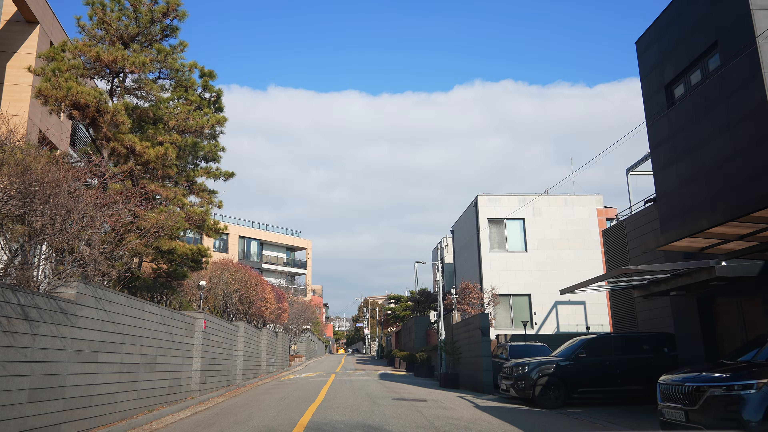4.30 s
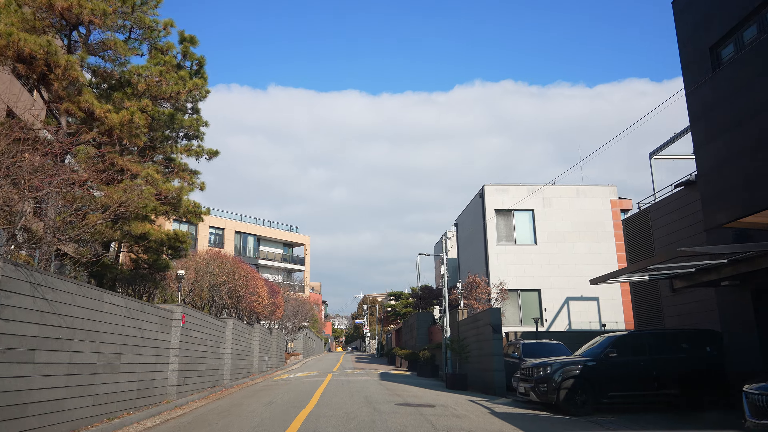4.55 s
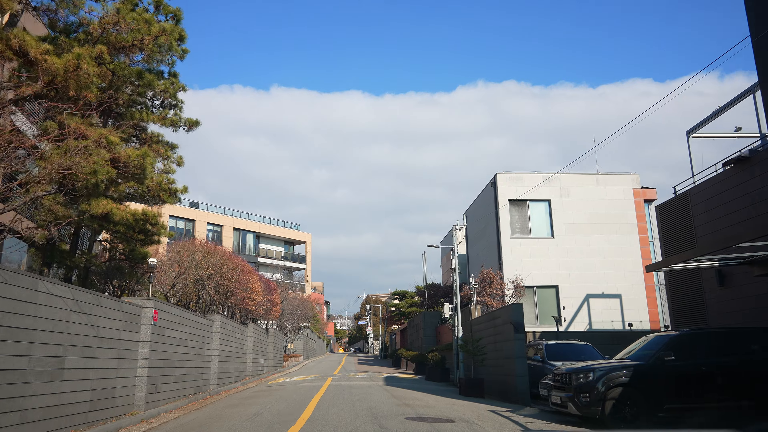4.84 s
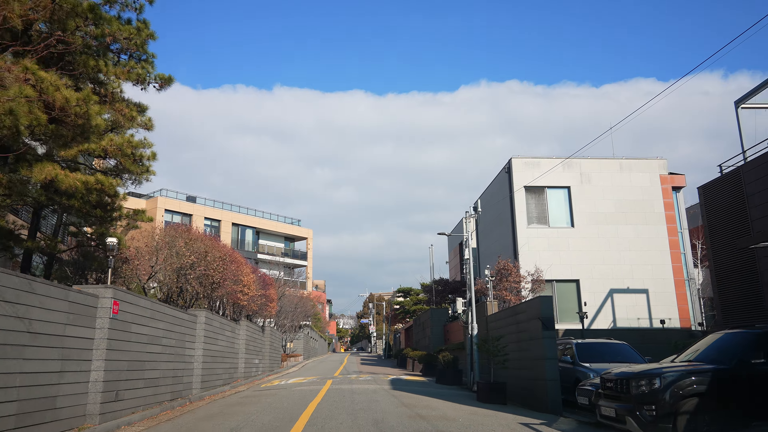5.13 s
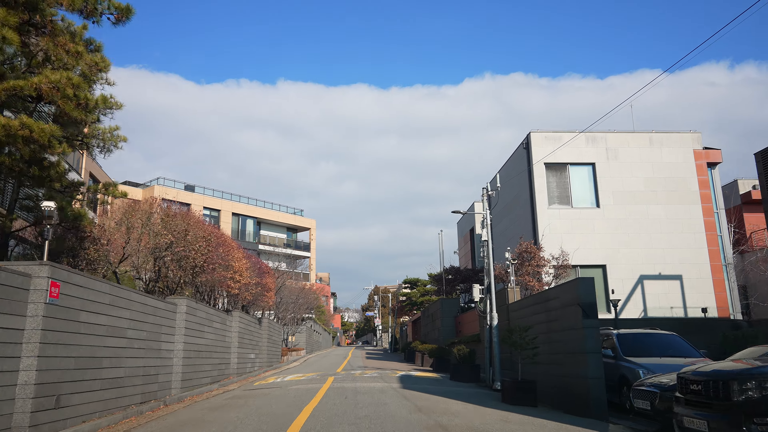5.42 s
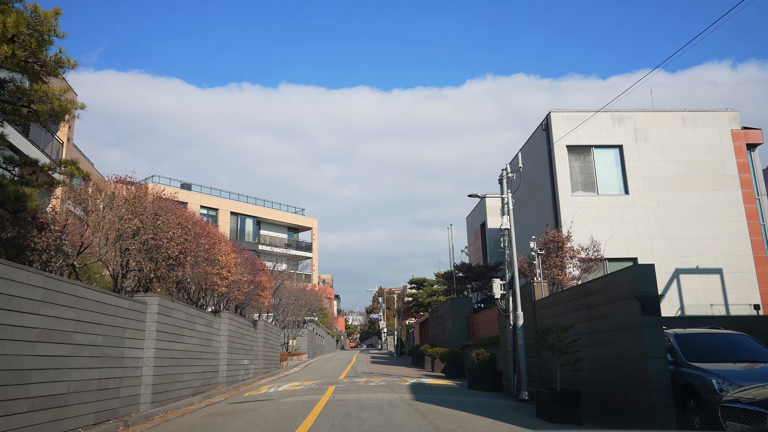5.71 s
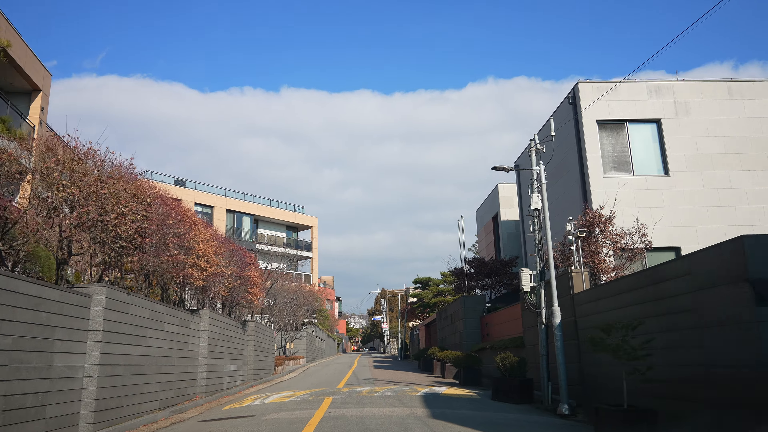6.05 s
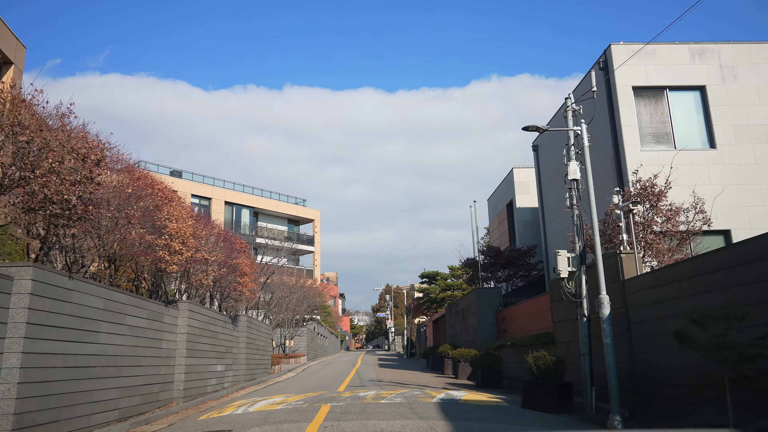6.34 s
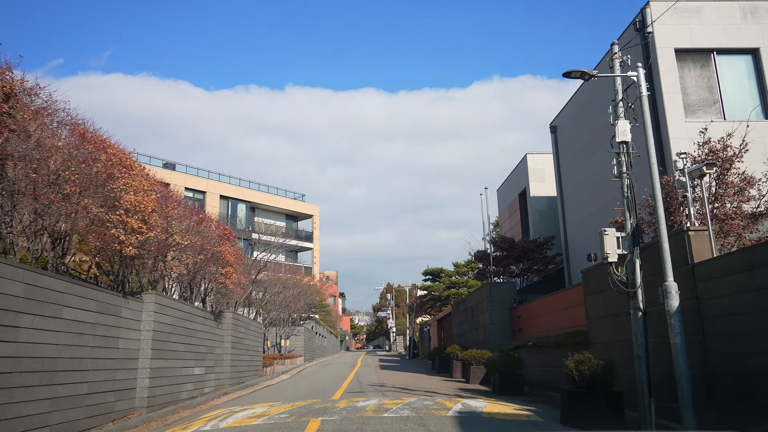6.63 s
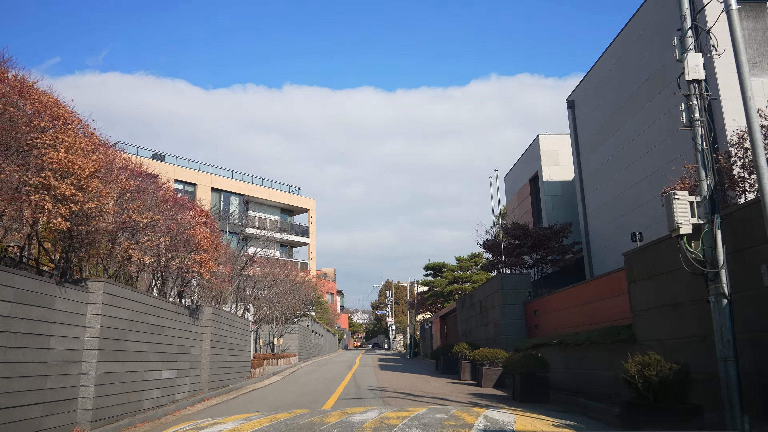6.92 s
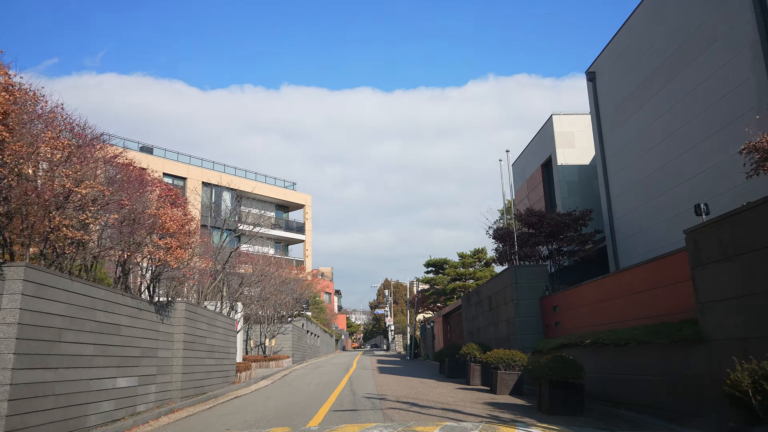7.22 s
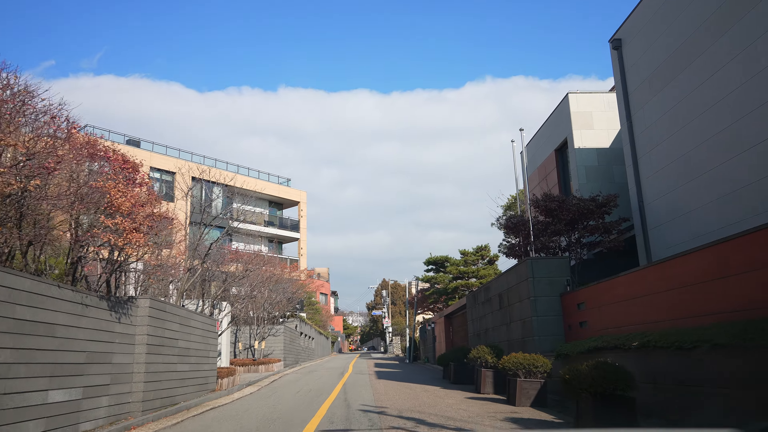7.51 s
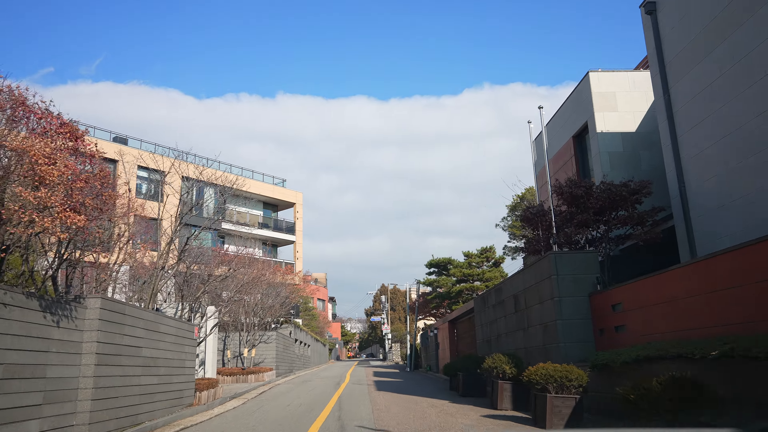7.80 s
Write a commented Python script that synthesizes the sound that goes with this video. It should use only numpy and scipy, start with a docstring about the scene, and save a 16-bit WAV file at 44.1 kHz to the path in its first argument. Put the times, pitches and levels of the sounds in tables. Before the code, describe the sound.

Inside a slowly moving car, a low tyre rumble and cabin boom run throughout, with lightly buzzing trim, a faint fan hiss and a thin electric whine. At about 1 second a bump brings a few plastic ticks, a dull knock and a tiny creak. At 1.5 seconds something soft, like a hand on the wheel, slides with a bright flick. From 2.4 to 3.2 seconds more bumps set the trim clicking and rattling. The soft sliding returns at 3.3 seconds, catches with a sharp snap at 4.2 and fades. Small jolts and clicks follow from 4.5 seconds. The front wheels thump into a speed hump at 6.1 seconds and the rear wheels land with a deep bounce at 6.6, amid the busiest clatter and brief creaks. The car rolls on with lighter bumps and ticks until nearly 8 seconds.

```python
"""Inside a car creeping along a residential street. Throughout, the tyres shake the body, the cabin
booms, loose trim buzzes, and a fan and a faint electric whine run. From about 1 s, bumps and jolts
set the trim ticking, creaking and later clattering. Something soft, like a hand on the wheel, slides
at 1.5 s with a flick, then again from 3.3 s, catching on a hard part at 4.2 s.
The front axle hits a speed hump at 6.1 s, the rear at 6.6 s; the trim rattles and the car rolls on."""
import sys
import numpy as np
from scipy.fft import rfft, irfft, next_fast_len
from scipy.io import wavfile
from scipy.ndimage import uniform_filter1d, map_coordinates

SR = 44100
rng = np.random.default_rng(int(sys.argv[2]) if len(sys.argv) > 2 else 0)


def output_pcm(signal):
    """Save a mono or channel-first signal as 16-bit PCM at the path in sys.argv[1].

    Samples are clipped to [-1, 1] before scaling.
    """
    pcm = np.clip(np.atleast_2d(signal).T, -1, 1) * 32767
    wavfile.write(sys.argv[1], SR, np.round(pcm).astype(np.int16))


N = 347067
T = np.arange(N) / SR

# shaking by the asphalt: (time [s], level [dB])
ROAD_LEVEL = [(0, -28.5), (.25, -31), (1.1, -30.5), (2.15, -32), (2.9, -28.5), (3.55, -31), (4.45, -28.5),
              (5.3, -30), (6.0, -28), (6.09, -31.5), (6.2, -28), (6.75, -26), (6.9, -30), (7.87, -30.5)]
# body drone: (frequency [Hz], density [dB])
DRONE_SPECTRUM = [(60, -29), (115, -5), (143, -2), (178, -6), (255, -8), (310, -14), (380, -19.5),
                  (600, -49.5)]
# hard plastic contact: (frequency [Hz], density [dB])
SNAP_SPECTRUM = [(1500, -33), (3500, -9), (5000, -1.5), (7300, 3.5), (9500, 0), (12000, -1.5), (13500, -6),
                 (15500, 0)]


def amp(db):
    """Decibels to gain."""
    return 10 ** (np.asarray(db) / 20)


def unit(x):
    """Scale to rms 1."""
    return x / np.sqrt(np.mean(x ** 2) + 1e-20)


def along(points, hz):
    """Interpolate (frequency, value) points on a log axis."""
    knots_hz, values = np.transpose(points)
    return np.interp(np.log(hz + 1), np.log(knots_hz), values)


def gain_curve(points):
    """(time, dB) points to a gain per sample."""
    return amp(np.interp(T, *np.transpose(points)))


def wobble(rate_hz):
    """Smooth random curve, rate_hz knots a second."""
    return map_coordinates(rng.standard_normal(int(N * rate_hz / SR) + 4), [T * rate_hz])


def filtered(x, response):
    """Apply a gain that depends on frequency."""
    size = next_fast_len(N + SR // 2)
    return irfft(rfft(x, size) * response(np.fft.rfftfreq(size, 1 / SR)), size)[..., :N]


def bell(hz, centre_hz, width_hz):
    """Gain of one resonance, 1 at its centre."""
    return 1 / (1 + (2 * (hz - centre_hz) / width_hz) ** 2)


def noise(response):
    """Stereo noise of rms 1: bass shared, treble diffuse."""
    # stereo width: (frequency [Hz], side re mid [dB])
    side_level = [(35, -15), (60, -16), (99, -33), (160, -18), (270, -9), (450, -4), (1220, -2),
                  (2500, 0.5), (6000, -0.5)]
    white = rng.standard_normal((2, N))
    mid, side = filtered(white, lambda hz: response(hz) * [np.ones_like(hz), amp(along(side_level, hz))])
    return unit(np.array([mid + side, mid - side]))


def rush(spectrum, lifts=()):
    """Noise with a spectrum and resonances on top."""
    return noise(lambda hz: amp(along(spectrum, hz) + sum(db * bell(hz, c, w) for c, w, db in lifts)))


def steady(x, window_s):
    """Even out swells slower than the window."""
    power = uniform_filter1d(np.mean(x ** 2, axis=0), max(int(window_s * SR), 1))
    return x / np.sqrt(np.abs(power) + 1e-6)


def panned(db):
    """Stereo gains for a left-right level difference."""
    return amp([[db / 2], [-db / 2]])


def swell(full_s, hold_s, rise_s, fall_s):
    """Envelope: grows to 1 at full_s, holds, decays."""
    return np.exp(np.minimum(T - full_s, 0) / rise_s - np.maximum(T - full_s - hold_s, 0) / fall_s)


def skitter(rate_hz, depth_db):
    """Envelope of uneven contacts: each starts sharply and fades until the next."""
    contacts = np.cumsum(rate_hz * np.exp(.5 * wobble(rate_hz))) / SR
    return unit(amp(-depth_db * (contacts % 1)))


def road(rolling, rocking, shaking, heave_db=-7, boom_db=-1, drone_db=-4, roar_db=-9,
         jolt_boom_db=-3, jolt_roar_db=-10, uneven_db=2):
    """Rough asphalt rocks the suspension, pumps the cabin air, shakes the body and roars in the tyres."""
    # suspension, cabin air, tyres: (frequency [Hz], density [dB])
    heave_spectrum = [(15, -47), (24, -19), (34, 1.5), (45, -7), (60, -5.5), (80, -47), (130, -59)]
    boom_spectrum = [(40, -54), (62, -18.5), (76, -0.5), (87, 4), (97, -1), (112, -13), (160, -21),
                     (300, -94)]
    roar_spectrum = [(200, -5.5), (330, -6), (420, 1.5), (620, -2), (800, -4.5), (1000, -3.5), (1150, -11),
                     (1500, -14), (2000, -20), (4000, -29.5)]
    # air modes of tyres and cabin: (frequency [Hz], width [Hz], lift [dB])
    cavities = [(234.5, 18, 2.5), (427, 33, 1.5), (586, 24, 5), (917, 64, 4.5)]
    heave = np.hypot(amp(heave_db) * rolling, rocking)
    boom = np.hypot(amp(boom_db + uneven_db * wobble(9)) * rolling, amp(jolt_boom_db) * shaking)
    drone = np.hypot(amp(drone_db) * rolling, shaking)
    roar = np.hypot(amp(roar_db) * rolling, amp(jolt_roar_db) * shaking)
    out = heave * steady(rush(heave_spectrum), window_s=0.21)
    out += boom * steady(rush(boom_spectrum), window_s=0.24)
    out += drone * steady(rush(DRONE_SPECTRUM, cavities), window_s=0.11)
    return out + roar * rush(roar_spectrum, cavities)


def hums(drive_hz=140, tyre_hz=233, tyre_db=-12, drift=0.045, swell_db=3):
    """The drive and the air in the tyres hum, wandering in pitch and level."""
    # drive hum: (time [s], level [dB])
    drive_level = [(0, -37.5), (.35, -34.5), (1.4, -48), (3.4, -51), (4.2, -38), (5.5, -41.5), (6.6, -35),
                   (7.87, -36)]

    def tone(hz):
        phase = 2 * np.pi * np.cumsum(hz * (1 + drift * wobble(11))) / SR
        return unit(amp(swell_db * wobble(13)) * np.sin(phase))
    drive = gain_curve(drive_level) * tone(drive_hz)
    return drive + gain_curve(ROAD_LEVEL) * amp(tyre_db) * tone(tyre_hz)


def fan(hiss_db=-54, hum_hz=920, hum_width_hz=36, hum_db=-54):
    """Steady air hiss; a hum and fuzzy electric whines drift in level together."""
    # air hiss: (frequency [Hz], density [dB])
    hiss_spectrum = [(500, -85), (1280, 0), (1500, -9.5), (1900, -12), (2250, -33), (2600, -15),
                     (3600, -20), (8000, -23.5), (15800, -43)]
    # whines: (frequency [Hz], nominal width [Hz], level [dB])
    whines = [(2022, 96, -59.5), (2415, 36, -59), (2635, 62, -74)]
    # hum and whines: (time [s], gain [dB])
    whine_gain = [(0, 0.5), (.9, -2.5), (1.8, -2.5), (2.3, 1), (3.0, -2.5), (7.87, -1)]
    bands = whines + [(hum_hz, hum_width_hz, hum_db)]
    tones = sum(amp(db) * noise(lambda hz: bell(hz, c, 2 * w) ** 2) for c, w, db in bands)
    return amp(hiss_db) * rush(hiss_spectrum) + gain_curve(whine_gain) * tones


def buzz(shake, chafe, pressed_share=0.44, rate_hz=200, depth_db=9):
    """Panels chafe in little bursts, harder when the body swings against them."""
    # chafing trim: (frequency [Hz], density [dB])
    trim_spectrum = [(900, -39), (1800, 0.5), (2700, 9), (3300, 7.5), (3900, -5.5), (4700, 6), (6000, -0.5),
                     (8500, 1), (11000, -9), (15500, -43.5)]
    swing = steady(shake, window_s=0.075).mean(axis=0)
    press = unit(np.maximum(swing, 0) ** 2)
    bursts = unit((1 - pressed_share + pressed_share * press) * skitter(rate_hz, depth_db))
    return chafe * bursts * rush(trim_spectrum)


def bumps(rise_s=0.011, boom_db=1, boom_t60_s=0.22, slap_db=-15, slap_t60_s=0.21):
    """Each road edge slaps the tyre and sets the cabin air booming."""
    # wheel meets edge: (time [s], strength [dB], boom [Hz])
    edges = [(.02, -23, 101), (0.974, -10.5, 94.3), (2.408, -7.5, 89.5), (2.616, -10.5, 85),
             (2.849, -13, 83), (4.587, -20, 82), (5.436, -12.5, 90), (5.833, -12, 82), (5.975, -15.5, 88),
             (6.15, -8.5, 92), (6.23, -6.5, 86.4), (6.277, -10, 81), (7.492, -15.5, 78),
             (7.647, -10.5, 81.3), (7.785, -13.5, 86)]
    boom, slap = np.zeros((2, N + SR))
    t = T[:SR // 2]
    for at_s, db, boom_hz in edges:
        onset = amp(db) * (1 - np.exp(-t / rise_s))
        ring = amp(-60 * t / boom_t60_s) * np.sin(2 * np.pi * boom_hz * t)
        boom[round(at_s * SR):][:len(t)] += onset * ring
        slap[round(at_s * SR):][:len(t)] += onset * amp(-60 * t / slap_t60_s)
    body = steady(rush(DRONE_SPECTRUM, lifts=[(154, 39, 1.6)]), window_s=0.038)
    return amp(boom_db) * boom[:N] + amp(slap_db) * slap[:N] * body


def light_strikes(chafe, count=24, level_db=-41, exponent=.55, scatter_db=2, knock_db=-10, pan_db=-3):
    """Strike rows for ticks(): denser and harder the more the trim works."""
    jitter, scatter = rng.random((count, 2)).T
    work = unit(chafe) ** exponent
    quantiles = (np.arange(count) + jitter) / count
    at = np.searchsorted(np.cumsum(work) / work.sum(), quantiles).clip(0, N - 1)
    levels_db = level_db + 20 * np.log10(work[at]) + scatter_db * (2 * scatter - 1)
    return [(at_s, db, knock_db, pan_db) for at_s, db in zip(T[at], levels_db)]


def ticks(chafe, snap_db=-3, snap_t60_s=0.0053, knock_db=7, knock_t60_s=0.08,
          cabin_db=-24, cabin_t60_s=.08, contact_s=0.0006, rebound_s=0.0067, rebound_db=-15):
    """Hard plastic contacts: a snap, its rebound, a hollow knock and a short cabin tail."""
    # loose trim: (time [s], strength [dB], knock offset [dB], left-right [dB])
    hard_strikes = [(.971, -33.5, -12.5, 0), (1.067, -37.5, -8, 1), (1.1249, -23, -19.5, -5),
                    (2.39, -30, -33, 0), (2.584, -31, -30, 0), (2.6554, -23.5, -21, -7),
                    (2.6905, -24.5, -17, -4), (2.8035, -22.5, -14, 0), (2.8425, -29, -22, -2),
                    (2.8918, -13.5, -39, 5), (2.9391, -15, -30, 4), (2.9806, -20, -23, 3),
                    (2.9892, -24, -28, 2), (3.0719, -24.5, -14.5, -3), (3.1123, -21, -23, -2),
                    (3.1508, -18, -23, 2), (3.1921, -21, -23.5, 5), (3.8113, -25, -33, 0),
                    (4.637, -17.5, -33, 6), (4.9527, -27.5, -13, -1), (4.9869, -28, -10, -4),
                    (5.9479, -28.5, -13.5, 0), (6.165, -23, -25, -6), (6.2488, -20.5, -26, 5),
                    (6.2896, -19, -20.5, -3), (6.3106, -25, -19, -1), (6.333, -15.5, -29, 3),
                    (6.686, -17.5, -13.5, -3), (6.7005, -19, -27, -3), (6.7095, -16, -17, -4),
                    (6.728, -18, -25, 2), (6.7521, -16, -21, -2), (6.771, -17, -31, 3),
                    (6.8188, -16.5, -28.5, 6), (6.9251, -21, -16, -3), (7.4525, -24.5, -24, -5),
                    (7.7412, -25, -31, -1), (7.8417, -31.5, -16, -3)]
    # hollow knock: (frequency [Hz], density [dB])
    knock_spectrum = [(200, -13), (650, -2), (1100, 5), (1700, -0.5), (2600, 3.5), (3600, -3), (5000, -2.5),
                      (9000, -10)]
    strikes = hard_strikes + light_strikes(chafe)
    snap, knock = np.zeros((2, 2, N + SR))
    t = T[:SR // 8]
    force = np.minimum(t / contact_s, 1) ** 2
    free_s = np.maximum(t - contact_s, 0)  # the part rings freely after contact
    cabin = amp(cabin_db - 60 * free_s / cabin_t60_s)
    snap_shape = force * (amp(-60 * free_s / snap_t60_s) + cabin)
    knock_shape = force * (amp(-60 * free_s / knock_t60_s) + cabin)
    flights_s = rebound_s * (.5 + rng.random(len(strikes)))
    for (at_s, db, hollow_db, pan_db), flight_s in zip(strikes, flights_s):
        gain = amp(db) * panned(pan_db)
        click = gain * amp(snap_db) * snap_shape
        snap[:, round(at_s * SR):][:, :len(t)] += click
        snap[:, round((at_s + flight_s) * SR):][:, :len(t)] += amp(rebound_db) * click
        knock[:, round(at_s * SR):][:, :len(t)] += gain * amp(hollow_db + knock_db) * knock_shape
    snaps = snap[:, :N] * steady(rush(SNAP_SPECTRUM), window_s=0.00068)
    return snaps + knock[:, :N] * steady(rush(knock_spectrum), window_s=0.0028)


def thuds(t60_s=0.09):
    """Larger panels are knocked and die away at once."""
    # dull knocks: (time [s], level [dB])
    blows = [(1.124, -30), (2.633, -27), (2.690, -39), (2.805, -28), (6.925, -26.5), (7.649, -29.5)]
    # panel: (frequency [Hz], density [dB])
    panel_spectrum = [(250, -7), (450, 5), (700, -3.5), (1050, 1.5), (1500, -31), (2500, -11), (5000, -45)]
    envelope = sum((T > at_s) * amp(db - 60 * np.clip(T - at_s, 0, 1) / t60_s) for at_s, db in blows)
    return envelope * rush(panel_spectrum)


def creaks(width_hz=600, grain_db=3):
    """Plastic gives briefly and scratchily at one resonance."""
    # creaks: (centre time [s], pitch [Hz], level [dB], half-length [s])
    slips = [(1.302, 4340, -41.5, 0.012), (1.305, 1350, -39.5, 0.018), (6.541, 1400, -31.5, 0.012),
             (6.721, 2460, -26.5, .011)]
    out = np.zeros((2, N))
    for at_s, pitch_hz, db, half_s in slips:
        band = steady(noise(lambda hz: bell(hz, pitch_hz, width_hz)), window_s=0.0054)
        out += amp(db) * np.exp(-((T - at_s) / half_s) ** 2) * band
    return out * unit(amp(grain_db * wobble(500)))


def jolts(rise_s=0.018, settle_s=.055):
    """Uneven ground and the hump: gains of heave, shake and buzz build quickly and settle."""
    # jolts: (time [s], hold [s], suspension heave [dB], body shake [dB], trim buzz [dB])
    shocks = [(1.385, 0.098, -30.5, -48, -60.5), (2.348, 0.286, -33, -33.5, -68), (2.83, .1, -28, -46, -55),
              (3.028, 0.12, -26, -37, -49), (4.532, 0.064, -28, -41, -49), (4.932, 0.11, -27.5, -33.5, -49),
              (5.968, 0.04, -22, -32, -50.5), (6.142, 0.0295, -44, -25.5, -50),
              (6.235, 0.08, -26, -26.5, -47), (6.382, .1, -28, -33.5, -47.5), (6.64, .14, -24, -33, -46.5),
              (7.444, .05, -32, -40, -51), (7.632, .15, -37, -37, -53.5)]
    return sum(np.outer(amp(levels_db), swell(at_s, hold_s, rise_s, settle_s))
               for at_s, hold_s, *levels_db in shocks)


def slides(gain_db=1, grain_db=1.5):
    """Soft strokes of friction, each with its own colour."""
    # strokes: (time of full pressure [s], hold [s], level [dB], rise [s], release [s])
    strokes = [(1.516, 0.042, -40.5, 0.13, 0.155), (3.298, 0.35, -43, .11, 0.15),
               (4.062, 0.048, -35.5, 0.12, 0.068), (4.225, 0.23, -36, 0.023, 0.085)]
    # friction, one spectrum per stroke: (frequency [Hz], density [dB])
    spectra = [
        [(1500, -23), (2500, -7), (3100, -1.5), (4000, -6), (4600, -1.5), (8500, -3), (15800, -15)],
        [(1500, -0.5), (3900, -6.5), (6400, -6), (7000, -2), (7800, -7), (15800, -10)],
        [(1200, -42), (2600, -6), (4700, -1.5), (8500, -1.5), (11500, -7), (15800, -5.5)],
        [(1200, -25), (2130, 2), (2550, -4), (3600, -5.5), (4800, -2.5), (6100, -2.5), (7300, -4.5),
         (11000, -5), (13700, 2.5), (15800, -5.5)],
    ]
    # modes of the rubbed surface: (frequency [Hz], width [Hz], lift [dB])
    surface_modes = [(4600, 200, 4.5), (5580, 200, 2.5), (6900, 250, 2), (8760, 410, 4.5), (12200, 500, 1)]
    out = sum(amp(db + gain_db) * swell(at_s, hold_s, rise_s, release_s) * rush(spectrum, surface_modes)
              for (at_s, hold_s, db, rise_s, release_s), spectrum in zip(strokes, spectra))
    return out * unit(amp(grain_db * wobble(250)))


def flick(at_s=1.517, snap_db=-27, snap_t60_s=0.052, tail_db=-39, tail_t60_s=0.24):
    """The first slide flicks over an edge: a thin, bright snap with a brief hiss."""
    # flick: (frequency [Hz], density [dB])
    spectrum = [(1200, -35), (2000, -18), (2400, 1), (3400, 4), (4600, 0), (6500, 0.5), (9000, -8),
                (11000, -13), (15500, -9)]
    t = np.clip(T - at_s, 0, 1)
    envelope = amp(snap_db - 60 * t / snap_t60_s) + amp(tail_db - 60 * t / tail_t60_s)
    return (t > 0) * envelope * rush(spectrum)


def clatter(t60_s=0.062, rate_hz=260, depth_db=9):
    """Loose things jump and skitter in quick runs of contacts."""
    # runs: (time [s], length [s], level [dB], knock offset [dB])
    runs = [(2.803, 0.044, -46, 4), (4.591, 0.012, -48, 14.5), (4.665, .008, -50, 13.5),
            (4.918, .016, -53, 13), (4.987, 0.014, -45, 11.5), (5.027, 0.011, -51, 16),
            (5.296, 0.028, -44.5, 1), (5.4, .012, -54.5, 13.5), (6.663, 0.028, -42.5, 9.5),
            (6.7, 0.026, -30.5, -7), (6.709, 0.011, -34.5, 7.5), (6.754, 0.0069, -25.5, -6.5),
            (6.77, 0.006, -33, -5)]
    # hollow rattle: (frequency [Hz], density [dB])
    rattle_spectrum = [(300, -25), (900, 10), (1400, 3.5), (1900, 0.5), (2500, 1), (3200, 1), (4200, -8),
                       (9000, -21)]
    snap, knock = np.zeros((2, N))
    for at_s, length_s, db, hollow_db in runs:
        run = (T > at_s) * amp(db - 60 * np.clip(T - at_s - length_s, 0, 1) / t60_s)
        snap += run
        knock += run * amp(hollow_db)
    sharp = rush(SNAP_SPECTRUM, lifts=[(14900, 2200, 4.1)])
    return skitter(rate_hz, depth_db) * (snap * sharp + knock * rush(rattle_spectrum)) * panned(-1.1)


def chatter(gain_db=1, t60_s=0.015, contact_s=0.0006):
    """A small loose fastener taps its panel in short runs of dry clicks."""
    # taps: (time [s], peak [dB])
    taps = [(2.928, -32), (3.029, -32), (3.063, -34), (3.104, -30), (3.144, -31), (4.549, -33.5),
            (4.618, -29), (4.893, -34), (4.9183, -33), (5.062, -33), (5.747, -30), (6.1618, -33),
            (6.1914, -29.5), (6.221, -31), (6.2481, -24.5), (6.278, -37), (6.3112, -25), (6.3717, -28.5),
            (6.4027, -28.5), (6.494, -30.5), (6.584, -29), (6.6555, -25), (7.1255, -41), (7.1529, -36.5),
            (7.1789, -41), (7.4226, -31.5), (7.4865, -29.5), (7.65, -35), (7.6864, -35), (7.7168, -31.5),
            (7.8422, -30.5)]
    # fastener: (frequency [Hz], density [dB])
    tap_spectrum = [(900, -1), (2000, -6), (2700, 5), (3300, 1.5), (3900, -7), (4700, -0.5), (6000, -8),
                    (8500, -5.5), (11000, -11), (15500, -12)]
    envelope, t = np.zeros(N + SR), T[:SR // 8]
    shape = np.minimum(t / contact_s, 1) * amp(-60 * np.maximum(t - contact_s, 0) / t60_s)
    for at_s, db in taps:
        envelope[round(at_s * SR):][:len(t)] += amp(db + gain_db) * shape
    return envelope[:N] * steady(rush(tap_spectrum), window_s=0.0063) * panned(-2.2)


def catch(at_s=4.186, grip_db=-25, rise_s=0.013, release_db=-22, fall_s=0.009,
          snap_db=-24, snap_t60_s=0.078):
    """The slide tightens against a small hard part, which lets go with a snap and a hollow ring."""
    # resonances of the catch: (frequency [Hz], width [Hz], level [dB])
    bands = [(900, 400, -9), (2240, 220, -7), (2880, 330, -10), (4440, 240, -10), (5280, 220, -9),
             (6380, 190, -4), (8030, 300, 1.5), (9990, 530, -7.5), (12300, 900, -12)]
    # modes of the part: (frequency [Hz], level [dB], t60 [s])
    modes = [(733, -28, .045), (986, -26, 0.048), (2240, -25, 0.057)]
    before_s, after_s = np.minimum(T - at_s, 0), np.clip(T - at_s, 0, 1)
    grip = amp(grip_db) * np.exp(before_s / rise_s)
    release = amp(release_db) * np.exp(-after_s / fall_s)
    force = np.where(before_s < 0, grip, release)
    ring = steady(noise(lambda hz: sum(amp(db) * bell(hz, c, w) for c, w, db in bands)), window_s=.008)
    snap = (after_s > 0) * amp(snap_db - 60 * after_s / snap_t60_s) * rush(SNAP_SPECTRUM)
    clink = sum(amp(db - 60 * after_s / t60_s) * np.sin(2 * np.pi * hz * after_s)
                for hz, db, t60_s in modes)
    return force * ring + snap + clink


def axles(rise_s=0.0054, slap_t60_s=0.14, bounce_hz=48, bounce_t60_s=0.44):
    """Each axle slaps into the hump, then the wheels bounce on their tyres."""
    # front, rear: (time [s], slap [dB], bounce [dB])
    hits = [(6.13, -21, -32), (6.568, -34, -15)]
    # tyre slap: (frequency [Hz], density [dB])
    slap_spectrum = [(60, -20), (130, 0), (220, 0), (380, -3.5), (600, -8), (1000, -17), (1600, -28),
                     (4000, -55)]
    slap, bounce = np.zeros((2, N))
    for at_s, slap_db, bounce_db in hits:
        t = np.clip(T - at_s, 0, 2)
        onset = 1 - np.exp(-t / rise_s)
        slap += onset * amp(slap_db - 60 * t / slap_t60_s)
        bounce += onset * amp(bounce_db - 60 * t / bounce_t60_s) * np.sin(2 * np.pi * bounce_hz * t)
    return bounce + slap * steady(rush(slap_spectrum), window_s=0.018)


def scene():
    """All sources, heard from behind the windscreen."""
    # trim fretting between jolts: (time [s], level [dB])
    fretting = [(0, -64.5), (.5, -66.5), (.7, -56.5), (2.0, -63), (2.6, -63), (2.85, -57), (5.2, -57.5),
                (5.8, -51.5), (6.55, -49.5), (7.0, -56.5), (7.87, -52.5)]
    rocking, shaking, jolt_chafe = jolts()
    chafe = np.hypot(gain_curve(fretting), jolt_chafe)
    shake = road(gain_curve(ROAD_LEVEL), rocking, shaking) + bumps() + axles() + hums()
    trim = buzz(shake, chafe) + ticks(chafe) + chatter() + thuds() + clatter() + creaks()
    return shake + trim + slides() + flick() + catch() + fan()


def record(dry, top_hz=15850):
    """Two microphones, slightly unlike in colour, pass nothing above top_hz."""
    # channel balance: (frequency [Hz], left-right [dB])
    balance = [(35, -2), (85, 1.15), (160, 0), (600, -2), (1300, -0.5), (2800, -1), (5500, 0.5), (9500, -2),
               (14000, 1.5)]
    return filtered(dry, lambda hz: amp(np.outer([.5, -.5], along(balance, hz))) * (hz < top_hz))


dry = scene()
out = record(dry)
output_pcm(out)
```